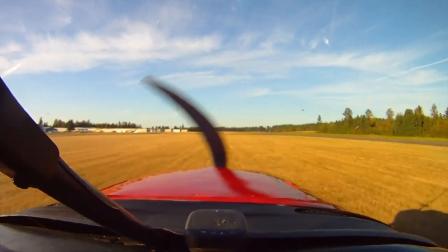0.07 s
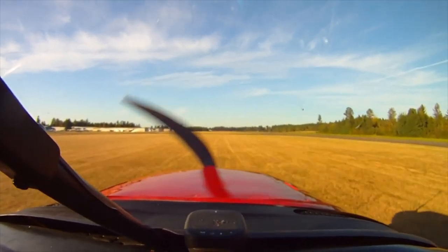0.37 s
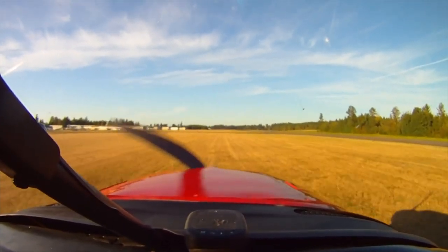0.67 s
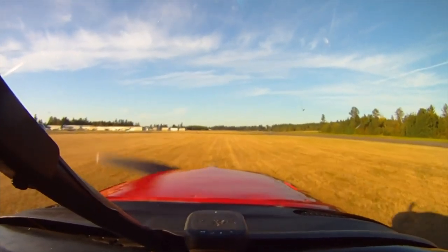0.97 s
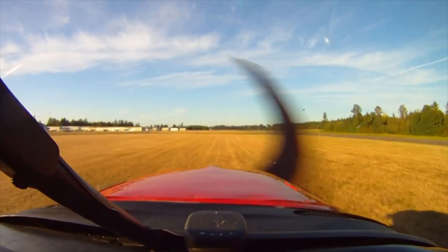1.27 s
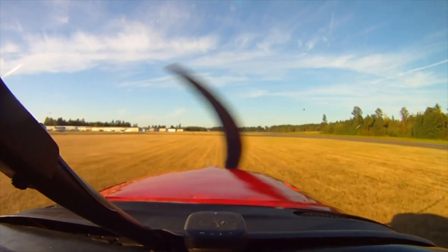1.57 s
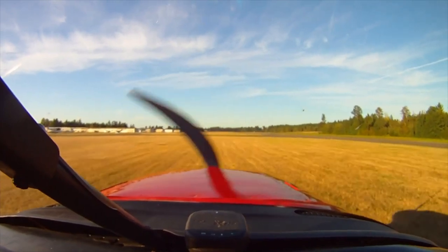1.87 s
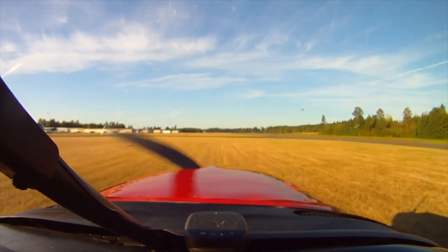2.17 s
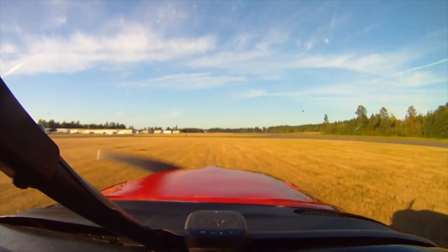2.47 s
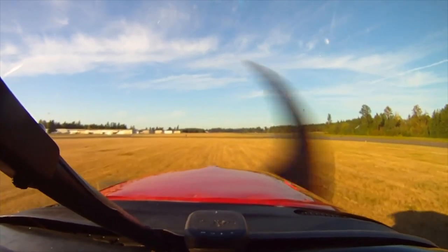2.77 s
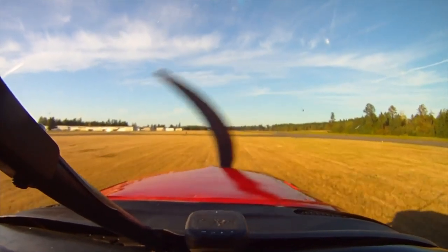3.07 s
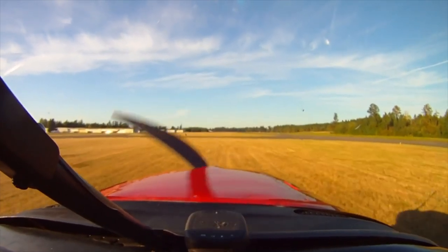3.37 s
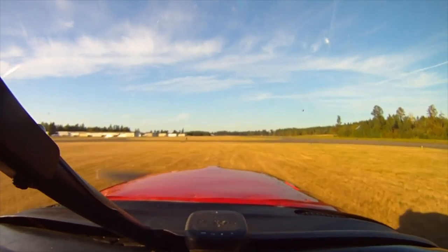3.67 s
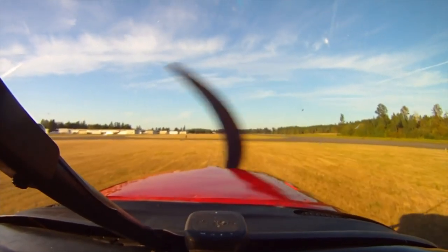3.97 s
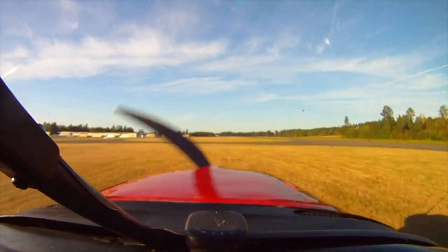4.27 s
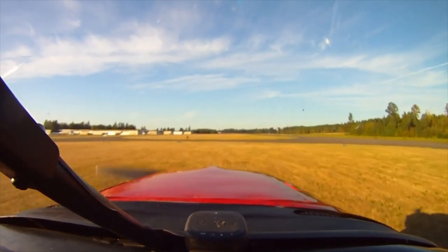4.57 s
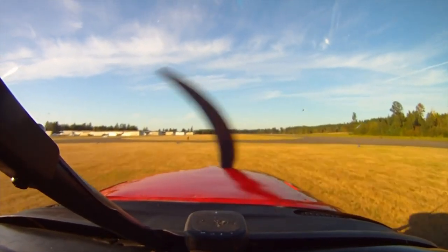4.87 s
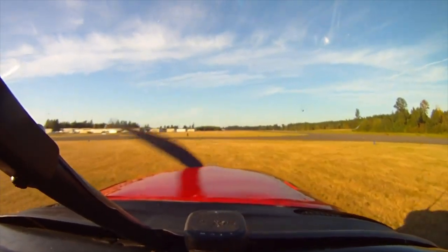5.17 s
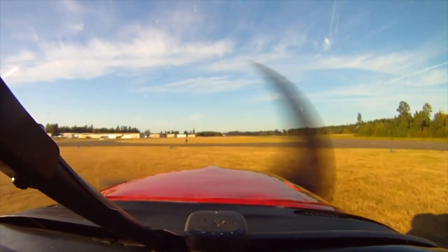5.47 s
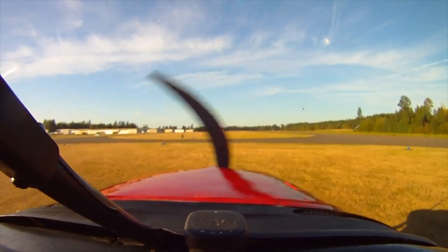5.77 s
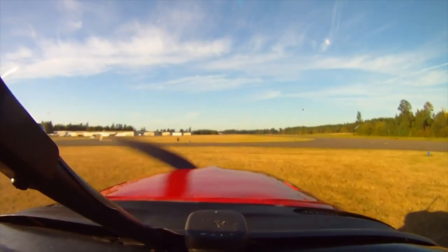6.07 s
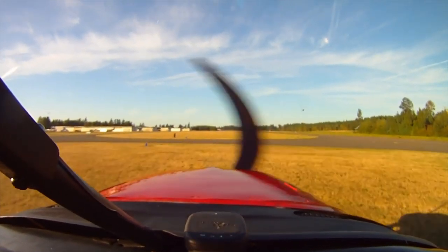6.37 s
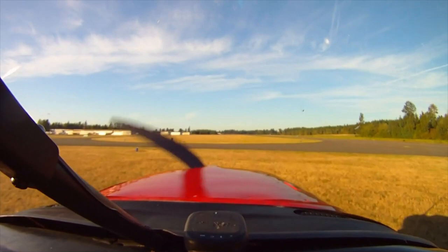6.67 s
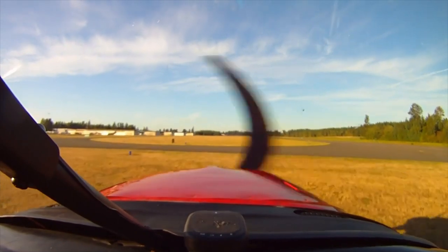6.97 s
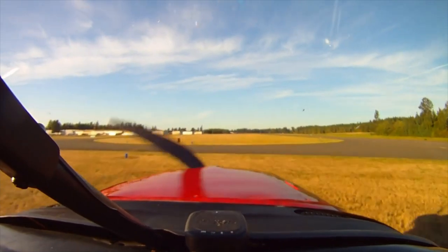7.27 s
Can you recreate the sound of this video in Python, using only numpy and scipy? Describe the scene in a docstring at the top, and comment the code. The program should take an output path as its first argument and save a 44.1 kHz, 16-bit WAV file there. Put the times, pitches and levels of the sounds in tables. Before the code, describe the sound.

A loose plastic part chatters and clacks in a light plane's cockpit, over a muffled engine drone and wheels rumbling on rough grass.

```python
"""Inside the cockpit of a light plane taxiing over rough grass; one microphone, close to a loose part.
From the start the muffled engine, the rumble of rolling and a faint steady whine lie underneath.
Jolts come thick and fast at first: each shakes the airframe, swells the drone and hiss, and sets the
plastic part chattering in time with the engine's firing, its contacts ringing a small hollow shell.
After a few seconds the jolts thin out, leaving room for lone knocks, a low buzz and small squeaks."""
import sys
import numpy as np
from scipy import signal
from scipy.fft import rfft, irfft
from scipy.io import wavfile
from scipy.ndimage import uniform_filter1d, minimum_filter1d

SR = 44100
rng = np.random.default_rng(int(sys.argv[2]) if len(sys.argv) > 2 else 0)


def unload_audio(sound):
    """Save the sound as a 16-bit wav file, at the path given as the first command line argument."""
    columns = np.transpose(np.atleast_2d(sound))
    # keep every value between -1 and 1, then stretch to whole-number steps
    steps = np.round(np.clip(columns, -1, 1) * 32767)
    wavfile.write(sys.argv[1], SR, steps.astype(np.int16))


N = 327663
TIME = np.arange(N) / SR

# jolts from the ground, each a spell of chatter: start_s, end_s, strength_db
JOLTS = [(0.0, 0.133, -21), (0.212, 0.335, -18), (0.355, 0.518, -19), (0.592, 0.62, -30),
         (0.665, 0.708, -21), (0.725, 0.755, -23), (0.775, 0.913, -20), (0.944, 0.975, -21),
         (1.01, 1.217, -22), (1.277, 1.345, -20), (1.367, 1.499, -20), (1.52, 1.552, -32),
         (1.578, 1.64, -21), (1.767, 1.869, -21), (1.912, 1.964, -21), (2.05, 2.073, -22),
         (2.203, 2.275, -19), (2.315, 2.48, -19), (2.545, 2.62, -34), (2.689, 2.784, -23),
         (2.874, 2.912, -25), (3.015, 3.045, -26), (3.16, 3.215, -30), (3.234, 3.284, -18),
         (3.45, 3.495, -28), (3.525, 3.56, -32), (3.775, 3.81, -24), (3.856, 3.931, -20),
         (4.209, 4.27, -22), (4.671, 4.745, -25), (4.949, 5.078, -23), (5.127, 5.288, -20),
         (5.33, 5.408, -19), (5.576, 5.628, -20), (5.777, 5.85, -17), (5.872, 5.922, -22),
         (6.024, 6.171, -19), (6.192, 6.23, -21), (6.523, 6.575, -20), (6.595, 6.64, -26),
         (6.777, 6.831, -22), (7.31, 7.36, -30)]
FULL_JOLT_DB = -20


def from_db(db):
    """Decibels to gain."""
    return 10 ** (np.asarray(db) / 20)


def rms_one(x):
    """Scale to an rms of 1."""
    return x / np.sqrt(np.mean(x ** 2) + 1e-20)


def butterworth(x, order, hz, kind):
    """Pass the low, high or middle band of a signal."""
    return signal.sosfilt(signal.butter(order, hz, kind, fs=SR, output="sos"), x)


def noise(spectrum):
    """Noise of rms 1, coloured by rows of frequency_hz, relative_db."""
    hz, db = np.transpose(spectrum)
    bins_hz = np.maximum(np.arange(N // 2 + 1) * SR / N, 1)
    colour = from_db(np.interp(np.log(bins_hz), np.log(hz), db))
    return rms_one(irfft(rfft(rng.standard_normal(N)) * colour, N))


def drift(rate_hz):
    """A random wander of rms 1, mostly slower than rate_hz."""
    bins_hz = np.arange(N // 2 + 1) * SR / N
    return rms_one(irfft(rfft(rng.standard_normal(N)) / (1 + (bins_hz / rate_hz) ** 2), N))


def shaking(calm_db=-22, calm_rise_db_per_s=0.23, spread_s=0.085):
    """Airframe shake in dB against a full jolt: each jolt spreads through the frame and settles."""
    push = np.zeros(N)
    for start, end, db in JOLTS:
        push[(TIME >= start) & (TIME < end)] = from_db(db - FULL_JOLT_DB)
    spread = np.hanning(int(spread_s * SR))
    sway = np.abs(signal.fftconvolve(push, spread / spread.sum(), "same"))
    calm = from_db(calm_db + calm_rise_db_per_s * TIME)
    return 20 * np.log10(calm + sway)


def rolling(shake_db, rumble_db=-33.5, hiss_db=-36.0, lumpy_db=1.5, ease_db_per_s=0.5):
    """Wheels on turf and propeller wash: lumpy rumble, and hiss that rises with jolts; both ease off."""
    # colour of the cabin rumble: frequency_hz, relative_db
    rumble_spectrum = [(15, -28), (33, -9), (46, -13.5), (62, 6), (80, -34), (98, -4.5), (125, 0.5),
                       (200, -8), (290, 1), (400, -6.5), (600, -4), (900, -1), (1300, 11), (2500, -37),
                       (8000, -66)]
    # colour of the cabin hiss: frequency_hz, relative_db
    hiss_spectrum = [(900, 9.5), (1900, 20), (2500, 13.5), (3200, 10), (4400, 10.5), (6000, 3.5),
                     (8000, -4), (10000, -26), (12500, -31), (15000, -41)]
    rumble = from_db(rumble_db + 0.049 * shake_db + lumpy_db * drift(9.7)) * noise(rumble_spectrum)
    hiss = from_db(hiss_db + 0.29 * shake_db) * noise(hiss_spectrum)
    return from_db(-ease_db_per_s * TIME) * (rumble + hiss)


def whine(pitch_hz=3386, level_db=-50):
    """A faint, steady high tone in the cabin."""
    return from_db(level_db) * np.sqrt(2) * np.sin(2 * np.pi * pitch_hz * TIME)


def engine(firings, shake_db, level_db=-43.0, waver_db=3.5, follows=0.4):
    """Four cylinders fire twice a turn; the muffled drone wavers and swells as the airframe shakes."""
    # engine tones: crank_multiple, relative_db
    orders = [(1, -19), (2, 1), (3, -17), (4, -20.5), (8, -15.5), (9, -9)]
    drone = 0
    for multiple, db in orders:
        sway = 0.9 * drift(8) / multiple  # the low orders wander most in phase
        phase = np.pi * multiple * firings + sway + rng.uniform(0, 2 * np.pi)
        drone += from_db(db + waver_db * drift(6)) * np.sin(phase)
    return from_db(level_db + follows * shake_db) * rms_one(drone)


def rustles(uneven_db=9.0):
    """A thin, uneven hiss that swells and fades, as of something sliding."""
    # soft rustles: start_s, end_s, level_db
    slides = [(2.48, 2.957, -60), (3.87, 4.002, -48)]
    # their colour: frequency_hz, relative_db
    spectrum = [(3000, -27), (6000, 28), (8500, 8), (10000, -1), (12000, -33)]
    envelope = np.zeros(N)
    for start, end, db in slides:
        at = np.flatnonzero((TIME >= start) & (TIME < end))
        envelope[at] += from_db(db) * np.sqrt(np.hanning(len(at)))
    return envelope * from_db(uneven_db * drift(40)) * noise(spectrum)


def squeaks(waver=0.025, chirps_per_s=1.2, chirp_s=0.027, chirp_hz=7770, chirp_db=-44):
    """Rubbing plastic sticks and slips in short, unsteady whistles; faint chirps fall at random."""
    # the placed squeaks: start_s, length_s, pitch_hz, peak_db
    placed = [(0.275, 0.0093, 6570, -24.5), (2.585, 0.041, 2850, -31), (3.619, .025, 8000, -46.5),
              (5.682, 0.027, 7700, -46), (6.29, 0.097, 5820, -44)]
    out = np.zeros(N)
    wobble = 1 + waver * drift(300)
    chance = rng.random((int(chirps_per_s * N / SR), 2))
    chirps = [(when * N / SR, chirp_s, chirp_hz * (1 + 0.0083 * (2 * pitch - 1)), chirp_db)
              for when, pitch in chance]
    for start, length, hz, db in list(placed) + chirps:
        at = np.flatnonzero((TIME >= start) & (TIME < start + length))
        phase = 2 * np.pi * hz * np.cumsum(wobble[at]) / SR
        out[at] += from_db(db) * np.hanning(len(at)) * np.sin(phase)
    return out


def snaps(fade_s=0.0012, body_hz=(5500, 10000), edge_hz=(10000, 14500)):
    """An edge catches and lets go with a short crack, sometimes dull, sometimes bright."""
    # sharp snaps, each band before its trim: start_s, body_db, edge_db
    cracks = [(0.2187, -21, -39), (0.2354, -19, -36), (0.4823, -22, -46), (0.8087, -24, -37),
              (1.3224, -15, -40), (2.2337, -29, -46), (2.4448, -31, -45), (3.2705, -35, -38)]
    out, age = np.zeros(N), np.arange(SR // 100) / SR
    for start, body_db, edge_db in cracks:
        burst = rng.standard_normal(len(age)) * np.exp(-age / fade_s)
        at = int(start * SR)
        for band_hz, peak_db in (body_hz, body_db - 2.0), (edge_hz, edge_db + 5.5):
            crack = butterworth(burst, 4, band_hz, "band")
            out[at:at + len(age)] += from_db(peak_db) * crack / np.abs(crack).max()
    return out


def strike_times(firings, start=0, end=TIME[-1], rebound_cycles=0.36, jitter_s=0.0004):
    """Every firing throws the part against one stop, and it rebounds against the other."""
    thrown = np.arange(*np.interp([start, end], TIME, firings))
    cycles = np.column_stack([thrown, thrown + rebound_cycles]).ravel()
    late_s = jitter_s * rng.standard_normal(len(cycles))
    return np.clip(np.interp(cycles, firings, TIME) + late_s, start, None)


def contacts(times, sizes, length_s, grit=1.0):
    """Each contact is a brief push: one clean touch amid a gritty scuff of smaller ones."""
    age = np.arange(256) / SR
    force = np.zeros(N + len(age))
    shape = np.sin(np.pi * np.minimum(age / length_s, 1)) ** 2
    touch = rms_one(signal.unit_impulse(len(age), np.argmax(shape)))
    for start, size in zip(times, sizes):
        scuff = rms_one(rng.standard_normal(len(age)) * shape)
        at = int(np.clip(start * SR, 0, N - 1))
        force[at:at + len(age)] += size * (touch + grit * scuff)
    return force[:N]


def resonate(force, modes):
    """A force rings parallel resonances of alternating sign."""
    out = 0
    for k, (hz, width_hz, db) in enumerate(modes):
        radius = np.exp(-np.pi * width_hz / SR)
        poles = [1, -2 * radius * np.cos(2 * np.pi * hz / SR), radius ** 2]
        gain = (-1) ** k * from_db(db) * (1 - radius ** 2) / 2
        out += gain * signal.lfilter([1, 0, -1], poles, force + 1e-18)
    return out


def shell(force, band_hz=(540, 2400), wall_hz=7000):
    """The hollow shell's nasal ring; its soft wall passes no high treble."""
    # modes of the shell: pitch_hz, width_hz, gain_db
    modes = [(550, 84, -16.5), (916, 71, -9), (1054, 160, -9.5), (1384, 90.5, 4), (1877, 230, -3),
             (2053, 190, -6.5)]
    ring = butterworth(resonate(force, modes), 2, band_hz, "band")
    return butterworth(ring, 4, wall_hz, "low")


def clack(force, soft_hz=5600, bright_db=-23):
    """The loose part's own short ring; the give of the plastic takes off most of the top."""
    # modes of the loose part: pitch_hz, width_hz, gain_db
    modes = [(2454, 259, 6), (2963, 576, -2.5), (3630, 1860, -10.5), (3710, 980, -1), (4400, 464, 5),
             (6440, 150, -16.5), (6900, 330, -60), (12200, 1500, -56)]
    ring = resonate(force, modes)
    dull = butterworth(ring, 3, [1500, soft_hz], "band")
    bright = butterworth(ring, 2, 6000, "high")
    return dull + from_db(bright_db) * bright


def buzz(times, shake_db, level_db=-26.5, follows=0.35, uneven_db=2.0, rub_db=-13, long_ring_db=-4):
    """The seated part nudges and rubs the shell, whose main mode then rings longer."""
    chance = np.minimum(rng.standard_normal(len(times)), 2)
    nudges = contacts(times, from_db(uneven_db * chance), length_s=0.0048)
    force = nudges + from_db(rub_db) * rng.standard_normal(N)
    long_ring = rms_one(resonate(force, [(1380, 40, 0)]))
    sound = rms_one(shell(force)) - from_db(long_ring_db) * long_ring
    return from_db(level_db + follows * shake_db - 0.07 * drift(16)) * rms_one(sound)


def stray_ticks(times, shake_db, level_db=-37, uneven_db=18.0, linger_s=0.066):
    """Around a jolt the part is only half seated, and some firings make it tick."""
    loose_db = uniform_filter1d(shake_db, size=int(linger_s * SR))
    chance = np.minimum(rng.standard_normal(len(times)), 1.5)
    sizes = from_db(uneven_db * chance + np.interp(times, TIME, loose_db))
    force = contacts(times, sizes, length_s=0.00085)
    return from_db(level_db) * rms_one(clack(force, soft_hz=3900))


def knocks(clack_trim_db=-4.0, ring_trim_db=5.5):
    """A small bump gives just one contact: a clack of the part and a ring of the shell."""
    # lone knocks, peaks before their trims: start_s, clack_db, ring_db
    bumps = [(0.1564, -2, -15), (1.7442, -3.5, -12), (2.1228, 1.5, -17.5), (2.1807, -0.5, -12),
             (2.8402, -8.5, -20), (2.9992, 6, -13.5), (3.3516, -7.5, -15), (3.8293, 2, -15),
             (4.0577, -17, -19.5), (4.3804, -3, -19.5), (4.4363, -12.5, -18.5), (4.8424, -33, -19),
             (4.9257, -8.5, -36), (5.1049, 2, -14.5), (5.2832, -10, -26), (5.9728, 1.5, -14.5),
             (6.2883, -13, -42), (6.3584, -4.5, -34), (6.7024, -3, -18)]
    out, length = np.zeros(N), SR // 25
    for start, clack_db, ring_db in bumps:
        push = contacts([0], [1], length_s=0.0019, grit=0.66)[:length]
        hard, hollow = clack(push), shell(push)
        sound = from_db(clack_db + clack_trim_db) * hard / np.abs(hard).max()
        sound += from_db(ring_db + ring_trim_db) * hollow / np.abs(hollow).max()
        at = int(start * SR)
        out[at:at + length] += sound
    return out


def chatter(firings, uneven_db=8.5, cap_db=2.5, rebound_db=4.0, ring_db=-20.0, ring_follows=0.62):
    """A jolt throws the part loose; while it lasts the part strikes both stops with uneven force."""
    spells = [strike_times(firings, start, end) for start, end, _ in JOLTS]
    times = np.concatenate(spells)
    # the gap between the stops caps how hard a strike can be
    strike_db = np.minimum(uneven_db * rng.standard_normal(len(times)), cap_db)
    opening = np.isin(times, [spell[0] for spell in spells])
    strike_db[opening] = 0  # the first strike is always firm
    strike_db[1::2] += rebound_db
    sizes = from_db(strike_db)
    part_force = contacts(times, sizes, length_s=0.0017)
    shell_force = contacts(times, np.sqrt(sizes), length_s=0.0016)
    out, tail = np.zeros(N), SR // 25
    for start, end, db in JOLTS:
        first, last = int(start * SR), int(end * SR)
        swell = 6.8 + np.sin(np.linspace(0, np.pi, last - first))  # a little stronger mid-jolt
        clacks = rms_one(clack(np.pad(part_force[first:last] * swell, (0, tail))))
        rings = rms_one(shell(np.pad(shell_force[first:last], (0, tail))))
        # light jolts lose more clack than ring
        sound = from_db(db) * clacks + from_db(ring_db + ring_follows * (db - FULL_JOLT_DB)) * rings
        sound *= np.sqrt((last - first) / len(sound))  # the tail adds no energy to the jolt
        out[first:first + len(sound)] += sound[:N - first]
    return out


def scene(firings_per_s=73.0, speed_wander=0.008):
    """At a steady throttle the engine sets the pace of drone and rattle; jolts set their strength."""
    firings = np.cumsum(firings_per_s * (1 + speed_wander * drift(2))) / SR  # running count
    shake_db = shaking()
    cabin = engine(firings, shake_db) + rolling(shake_db) + whine()
    times = strike_times(firings)
    rattle = knocks() + snaps() + chatter(firings) + buzz(times, shake_db) + stray_ticks(times, shake_db)
    rubbing = squeaks() + rustles()
    return (cabin + rubbing + rattle)[None]


def record(dry, ceiling=1.0, stop_hz=16700):
    """The cockpit microphone feeds a fast limiter that holds the hardest clacks down; the top is cut."""
    needed_gain = ceiling / np.maximum(np.abs(dry), ceiling)
    gain = uniform_filter1d(minimum_filter1d(needed_gain, size=45), size=45)  # about 1 ms
    return signal.sosfilt(signal.cheby2(12, 60, stop_hz, fs=SR, output="sos"), dry * gain)


dry = scene()
out = record(dry)
unload_audio(out)
```